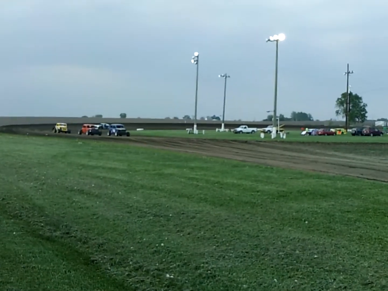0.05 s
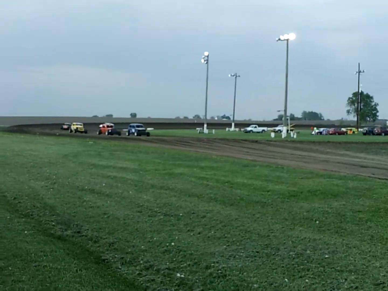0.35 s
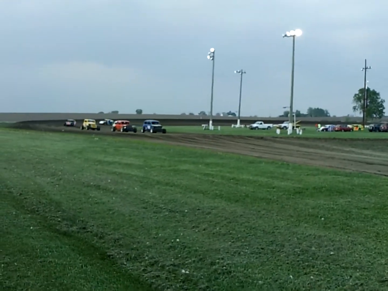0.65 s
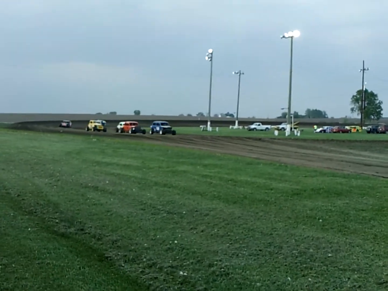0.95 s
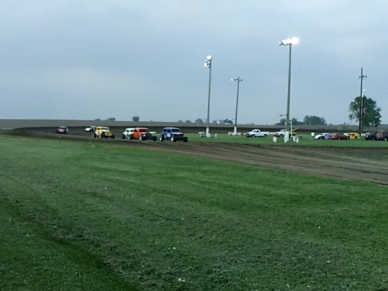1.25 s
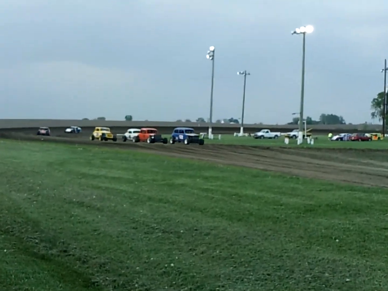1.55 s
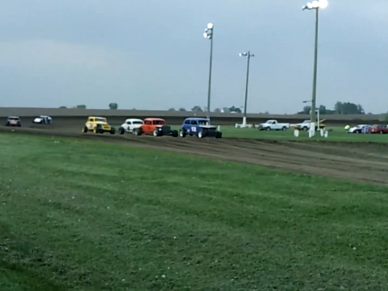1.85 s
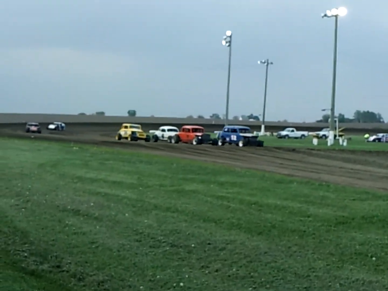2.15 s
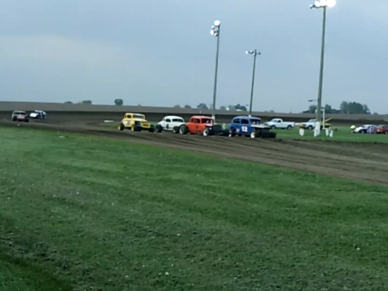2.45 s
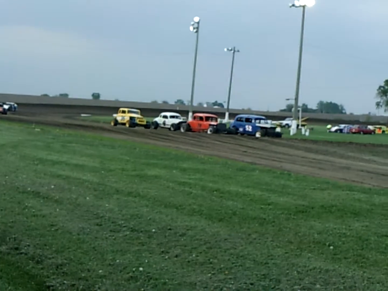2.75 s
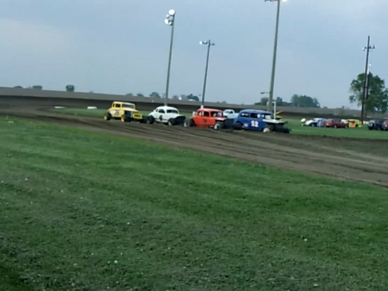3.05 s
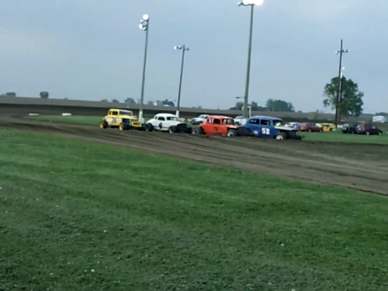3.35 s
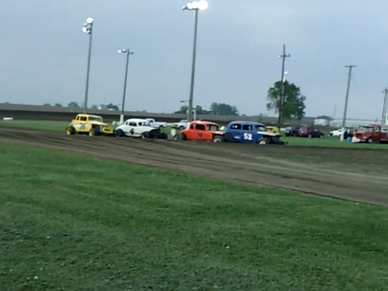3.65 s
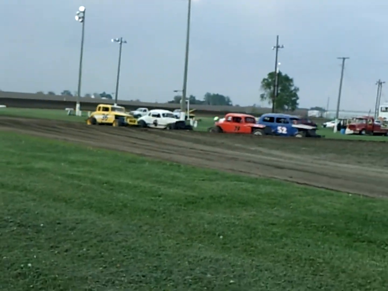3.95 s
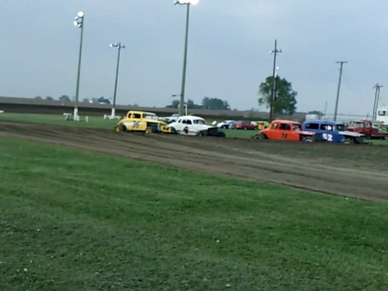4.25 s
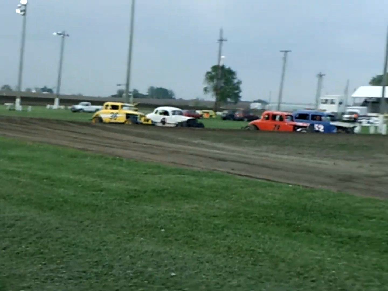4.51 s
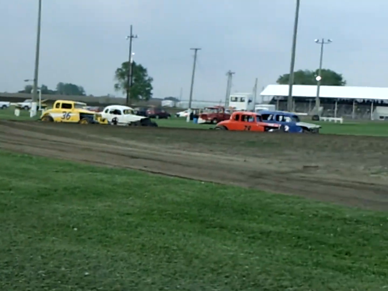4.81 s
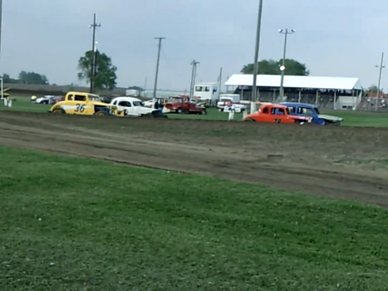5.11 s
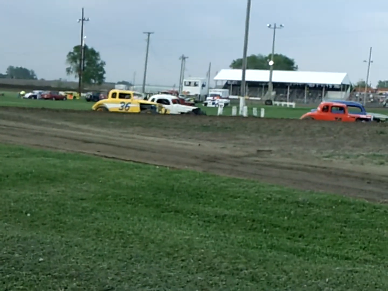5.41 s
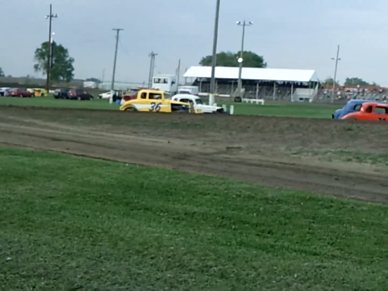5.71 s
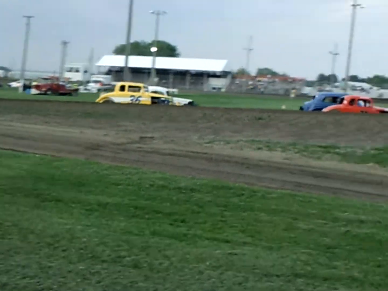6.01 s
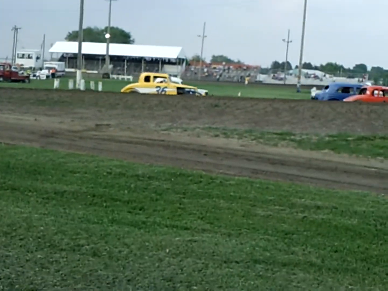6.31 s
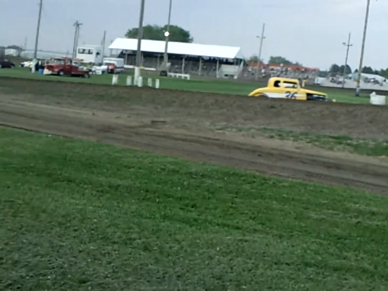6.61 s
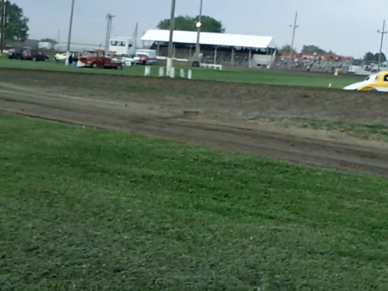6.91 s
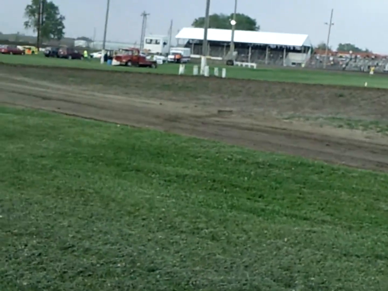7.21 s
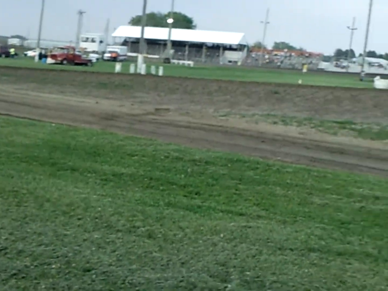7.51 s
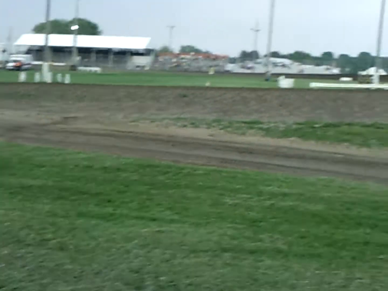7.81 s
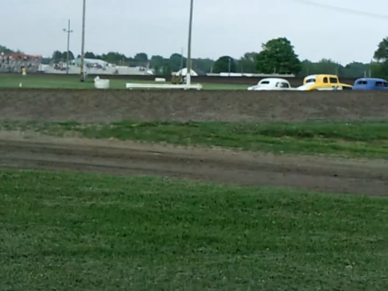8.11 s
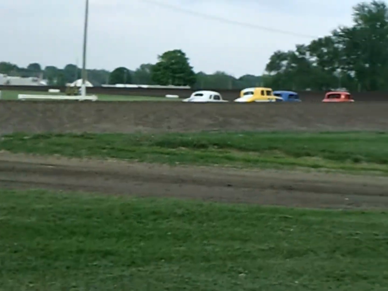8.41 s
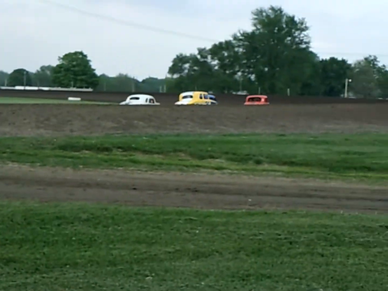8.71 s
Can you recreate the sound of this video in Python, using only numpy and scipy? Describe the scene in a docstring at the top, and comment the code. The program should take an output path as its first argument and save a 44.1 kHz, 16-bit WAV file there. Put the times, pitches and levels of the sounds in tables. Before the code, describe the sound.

A pack of race cars drones around a dirt track, exhausts crackling and tyres hissing in a light breeze.

```python
"""On the grass outside the turn of a dirt oval, a pack of V8 stock cars rolls round at part throttle.
Four near engines drone and beat against the lumpy burble of the field, their firings ringing the pipes.
Two drivers blip the throttle into the turn, exhausts crackle, and tyres hiss and fling dirt.
There is one brief click with a low thump, like a dropout in the sound.
A leaking manifold spits as the cars pull away, and a breeze buffets below."""
import sys
import numpy as np
from scipy import signal
from scipy.fft import rfft, irfft, next_fast_len
from scipy.io import wavfile
from scipy.ndimage import uniform_filter1d

SR = 44100
rng = np.random.default_rng(int(sys.argv[2]) if len(sys.argv) > 2 else 0)


def wav_record(signal):
    """Record a signal, one row per channel, as 16-bit PCM in the file named by sys.argv[1]."""
    frames = np.transpose(np.atleast_2d(signal))
    bounded = np.clip(frames, -1, 1)
    # unit amplitude maps onto the largest positive 16-bit level
    quanta = np.round(bounded * 32767).astype(np.int16)
    wavfile.write(sys.argv[1], SR, quanta)


N = 390726

# each near engine's boom, its strongest order: (time [s], pitch [Hz], level [dB])
LEADER_BOOM = [(0, 96, -37), (0.301, 97, -23.5), (.47, 104, -26), (.6, 104, -28.5), (1.0, 104.3, -26.5),
               (1.799, 104.5, -32), (2.35, 113, -32), (2.621, 118.5, -19), (3.15, 113.5, -42),
               (3.37, 118.5, -19), (3.56, 121.5, -20), (3.76, 128.5, -23.5), (4.349, 126.5, -27.5),
               (5.0, 123.6, -24.5), (5.4, 123, -32.5), (5.801, 120, -44), (6.598, 112, -28),
               (7.4, 114.4, -39), (8.07, 110.8, -30), (8.86, 107.5, -44)]
SECOND_BOOM = [(0, 159.1, -38), (.7, 158.9, -36.5), (1.45, 155.2, -40), (2.5, 152.9, -33),
               (3.5, 152.5, -31.5), (3.8, 160.2, -35), (4.4, 157.8, -31), (4.7, 153.6, -31.5),
               (5.05, 153.9, -26.5), (5.9, 150.9, -36), (6.45, 149.2, -30.5), (7.1, 144.3, -32.5),
               (7.7, 143.9, -32.5), (8.86, 149.7, -34)]
THIRD_BOOM = [(0, 77.9, -39), (.35, 75.5, -38), (1.0, 75.3, -37.5), (1.95, 68.5, -42.5), (2.3, 70.4, -40),
              (3.2, 72, -33), (3.82, 81.1, -26), (4.6, 77.8, -32.5), (5.1, 77.6, -28), (5.439, 80.7, -29),
              (6.0, 76, -38), (6.75, 78.3, -31.5), (7.35, 75.9, -29.5), (7.941, 78.7, -32.5),
              (8.86, 80, -27)]
FOURTH_BOOM = [(0, 116.8, -19), (.3, 116.6, -34), (.55, 116, -26.5), (.75, 115.1, -24),
               (1.15, 120.7, -28.5), (1.95, 117.2, -27.5), (2.2, 115.6, -38), (2.54, 113.4, -32),
               (2.85, 112.9, -33), (2.97, 112.5, -23), (3.1, 112.3, -32), (3.35, 110.9, -42),
               (3.801, 119, -29), (5.048, 118.6, -35.5), (5.65, 116.3, -28), (5.84, 107.2, -38),
               (5.93, 103.5, -24), (6.08, 106.1, -31), (6.291, 107.1, -20.5), (7.1, 112.9, -45),
               (7.76, 115.4, -33), (8.35, 117.1, -35), (8.86, 116, -30.5)]
# the eight firings of a cycle, weaker from the far bank's pipe: (strength [dB])
FIRING_DB = [1.5, -14.5, -3, -2.5, -21.5, -1.5, -10, -19.5]
# a driver opens the throttle and the pipe barks: (car, start [s], length [s], level [dB])
BARKS = [("leader", 3.565, 1.02, -38), ("leader", 3.3, 0.28, -37.5), ("second", 8.1, 0.47, -45),
         ("third", 4.3, 0.44, -44.5), ("third", 7.3, 0.588, -50), ("second", 0.55, 0.58, -44),
         ("fourth", 2.19, 0.59, -41.5), ("fourth", 3.2, 0.66, -38), ("fourth", 4.85, 0.9, -44),
         ("fourth", 7.5, 0.72, -39.5)]
# a pipe blares under load: (car, start [s], length [s], resonance [Hz], level [dB])
BLARES = [("third", 0.0, 0.061, 510, -48), ("leader", 0.3, 1.1, 527, -54), ("third", 0.33, 0.64, 370, -52),
          ("second", 0.19, 1.2, 800, -52.5), ("fourth", 2.5, 0.48, 675, -50),
          ("fourth", 3.35, 0.41, 550, -50), ("leader", 3.7, 0.6, 540, -53.5),
          ("second", 4.78, 0.42, 1530, -51), ("third", 4.79, 0.33, 1780, -56.5),
          ("fourth", 2.82, .35, 2100, -58.5), ("third", 4.55, 0.53, 391, -42),
          ("second", 5.05, 0.26, 285, -39.5), ("leader", 5.55, 0.2, 295, -39),
          ("second", 6.42, .4, 292, -39), ("leader", 4.8, 1.3, 1270, -53.5),
          ("second", 5.4, 1.376, 640, -56.5), ("third", 6.9, 0.58, 605, -48),
          ("leader", 7.55, 0.68, 1170, -52), ("second", 7.7, .55, 1380, -53),
          ("second", 7.65, 0.84, 980, -57), ("fourth", 7.7, 0.738, 712, -50)]
# tone of the near cars' pipes: (frequency [Hz], gain [dB])
NEAR_PIPE_EQ = [(150, -39), (240, -5), (300, 4), (350, 0.5), (400, -6.5), (470, -14), (560, -9),
                (660, -24.5), (780, -26.5), (1100, -25.5)]
# lumps (+) and brief dips (-) in the low drone: (time [s], width [s], gain [dB])
THROBS = [(0.31, 0.014, -17), (0.343, 0.035, 4), (0.425, 0.015, -4), (0.464, 0.022, 5), (0.722, 0.015, 6.5),
          (0.885, .02, -7), (1.175, 0.011, 7), (1.32, 0.028, -9), (1.971, 0.025, 4), (2.45, .03, -3),
          (2.545, 0.015, 5), (2.92, 0.0096, -21), (2.949, 0.018, 4), (3.07, 0.017, -8), (3.375, .02, 5),
          (4.103, 0.021, 2.5), (5.019, 0.023, 4), (5.27, .015, -6), (5.6, .03, -1), (5.676, 0.048, 5),
          (5.85, 0.039, -8), (5.922, 0.022, 6), (6.304, .04, 2.5), (6.42, 0.018, -12), (6.533, .02, 3),
          (6.59, 0.021, -9), (6.821, 0.017, 4), (8.25, .02, -4.5)]

# engine speeds of the far cars: (cycle rate [Hz])
FIELD_CYCLE_HZ = [18.4, 21.3, 22.6, 24.2, 27.5]
# faders for the whole field, before trim: (time [s], rumble [dB], bark [dB], rasp [dB])
FIELD_FADERS = [(0.1, -19.5, -40, -44), (0.12, -20.5, -35.5, -46), (0.63, -23.5, -33, -45.5),
                (1.62, -19.5, -33.5, -47.5), (1.69, -25.5, -37.5, -47.5), (2.05, -18, -31.5, -45.5),
                (2.46, -19.5, -34, -43), (2.53, -19.5, -31.5, -45.5), (3.26, -19, -34, -48),
                (3.43, -22.5, -34, -46), (3.76, -22, -34.5, -46.5), (4.63, -22, -35.5, -47.5),
                (5.18, -20, -34, -46), (6.89, -19, -33.5, -44), (7.06, -23, -40.5, -46),
                (8.44, -17, -32.5, -42.5), (8.75, -18, -30.5, -45)]
# centre of the field's bark, wandering between 280 and 354 Hz: (time [s], frequency [Hz])
BARK_CENTRE = [(0, 280), (.8, 303), (1.6, 300), (2.5, 340), (3.6, 338), (4.4, 320), (4.85, 354), (6.8, 303),
               (7.5, 335), (8.86, 323)]
# tone of the field's three exhaust layers: (frequency [Hz], gain [dB])
RUMBLE_EQ = [(30, -48.5), (55, -12), (75, -11.5), (92, -0.5), (110, 3.5), (135, -4), (165, -10.5),
             (200, -18.5), (250, -31.5), (400, -55)]
BARK_EQ = [(150, -26), (205, -4.5), (250, 4.5), (300, 6.5), (355, 2.5), (410, -8), (480, -19), (700, -50)]
RASP_EQ = [(300, -14), (450, -2.5), (560, -3.5), (720, -2), (880, -8.5), (1100, -10.5), (1600, -32.5),
           (3000, -37.5)]

# two drivers lift off and blip: (time [s], one bank's firing rate [Hz], level into the pipe [dB])
BLIP = [(0, 73.6, -34), (.07, 61.9, -41), (.16, 48.2, -45), (.23, 61.6, -46), (.32, 69.6, -38),
        (.42, 77, -38), (.6, 86, -38.5), (.78, 87.23, -37), (.9, 81, -41), (1.02, 73.7, -46),
        (1.15, 68.4, -52), (1.4, 68, -90)]
PICKUP = [(0, 66, -70), (.28, 67, -49), (.4, 71, -40), (.52, 76, -36), (.65, 77.5, -36), (.82, 71, -42.5),
          (.98, 68, -38.5), (1.1, 73, -33.5), (1.2, 76.8, -39), (1.44, 77.6, -34), (1.56, 72, -49),
          (1.8, 68, -92)]
# resonances of their pipes: (frequency [Hz], gain [dB])
REV_PIPE_EQ = [(130, -4), (170, -1.5), (225, -4), (305, 0.5), (375, -10.5), (440, -16.5), (520, -23),
               (700, -32)]

# cars sweep by, throwing dirt:
# (start [s], attack [s], length [s], release [s], clatter [dB], swish [dB], hiss [dB], spray [dB])
PASSES = [(0.0, 0.012, 0.63, 0.94, -56, -53.5, -59, -68), (0.342, 0.024, 0.078, 0.033, -52, -60, -58, -61),
          (1.852, 0.17, 0.8, 0.51, -57, -53, -53, -74), (2.358, .008, 0.021, 0.018, -47, -49, -41, -58),
          (2.75, 0.19, 0.62, 0.26, -52, -57, -51, -73), (3.45, .1, 0.58, .1, -54, -66, -63, -76),
          (3.863, 0.18, 0.4, 0.2, -51.5, -58, -45, -58.5),
          (4.751, 0.18, 0.58, 0.48, -50.5, -67, -46.5, -58.5), (5.2, 0.27, 0.4, 1, -54.5, -64, -47, -58.5),
          (5.93, 0.17, 0.91, 0.22, -52.5, -47.5, -46.5, -56),
          (6.208, 0.031, 0.034, 0.033, -60, -60, -46, -63),
          (6.983, 0.67, 1.04, 0.62, -50, -46.5, -45.5, -57),
          (7.997, 0.36, 0.62, 0.71, -50.5, -46.5, -45.5, -56)]
# the rolling bed under the passes: (clatter [dB], swish [dB], hiss [dB], spray [dB])
ROLLING_DB = [-53, -52, -50, -63.5]
# tone of engine clatter, tyre swish, tyre hiss and fine dirt spray: (frequency [Hz], gain [dB])
CLATTER_EQ = [(700, -17.5), (1150, -2), (1400, -4), (1650, -3), (2100, -6), (2600, -12.5), (4000, -41)]
SWISH_EQ = [(1700, -15), (2500, 1.5), (3200, 4), (4000, 4), (4600, 0.5), (5500, 7), (8000, -28)]
HISS_EQ = [(3200, -29), (4100, -6), (4750, 0), (5200, 2.5), (5550, -6), (6200, -29), (7500, -44.5),
           (12000, -45.5)]
SPRAY_EQ = [(4500, -21.5), (6000, 6.5), (7000, 1.5), (8100, -4.5), (9000, -14.5), (10500, -18),
            (12000, -28.5)]

# the loudest exhaust crackles: (time [s], strength [dB], brightness [dB], ring [Hz])
CRACKLES = [(0.005, -31.5, -26, 5270), (0.0248, -34, -29, 5400), (0.0752, -37, -30, 4910),
            (0.0972, -31, -25, 5200), (0.1181, -34, -20, 5000), (0.1925, -33, -18, 4950),
            (0.2324, -30, -23.5, 4800), (0.2843, -44, -16.5, 5400), (0.3361, -37, -23, 4460),
            (0.3591, -26, -24, 5180), (0.3787, -35, -22, 5600), (0.4005, -30, -21, 5695),
            (0.409, -36, -26, 5200), (0.4514, -30, -19.5, 5530), (0.6898, -38, -19, 5306),
            (0.7008, -31, -23, 4620), (0.7362, -36, -25, 4963), (0.7412, -33, -18, 5186),
            (0.9981, -34, -30, 5200), (1.1214, -28.5, -32, 5000), (1.277, -40, -16.5, 5260),
            (1.7439, -41, -17, 5050), (2.8414, -38, -17, 5040), (3.2814, -31, -22, 5100),
            (6.86, -42, -15.5, 5096), (7.6392, -39, -12, 5105)]
# the leak turns towards the listener and away: (time [s], strength [dB], brightness [dB])
LEAK_CURVE = [(7.3, -33, -28), (7.55, -36, -32), (7.9, -31, -29), (8.1, -28, -21), (8.17, -30, -19),
              (8.33, -33, -20), (8.48, -33, -29)]
# the leak's accented spits: (time [s], strength [dB], ring [Hz], brightness [dB])
HARD_SPITS = [(7.4168, -30, 4860, -35), (7.4951, -29, 5160, -34), (7.5213, -33, 5440, -33),
              (7.547, -29, 5140, -34), (7.5735, -24, 5180, -36), (7.5996, -26, 4900, -37),
              (7.6137, -24, 4870, -37), (7.626, -28, 4800, -36), (7.7042, -23.5, 5140, -38),
              (7.7302, -26.5, 5150, -35), (7.7803, -26.5, 5100, -32), (7.8055, -25.5, 5230, -29),
              (7.8836, -25.5, 4760, -34), (7.9345, -30, 5000, -28), (7.986, -26, 5110, -29),
              (8.0105, -23.5, 5060, -33), (8.0356, -23.5, 5140, -28), (8.0613, -23, 4910, -28),
              (8.0744, -27, 4800, -26), (8.0862, -23, 5080, -31), (8.1108, -26.5, 5400, -24),
              (8.1361, -32, 5200, -21), (8.1621, -23, 5100, -29), (8.175, -33, 5100, -18),
              (8.1872, -23.5, 5150, -28), (8.2114, -29.5, 4890, -21), (8.2501, -31, 5170, -19),
              (8.262, -27.5, 5340, -24), (8.2872, -33, 5200, -17.5), (8.3502, -36, 5320, -25)]
# tone of a pop's ringing body and of its thin edge: (frequency [Hz], gain [dB])
POP_BODY_EQ = [(1000, -28), (3000, -24.5), (4300, -6), (4900, -0.5), (5300, -2.5), (5900, -2), (7500, -37),
               (11000, -43), (16000, -61.5)]
POP_EDGE_EQ = [(4500, -23.5), (6300, 7.5), (7600, 2.5), (9000, -10.5), (10500, -12.5), (13000, -28.5),
               (16000, -36)]

# a brief click and its low thump: (level [dB], decay [s])
CLICK_PARTS = [(-24, .0007), (-28, .014)]
# showers of flung dirt: (start [s], length [s], top strength [dB])
DIRT_SHOWERS = [(0.299, 2.6, -44), (6.699, 1.7, -45.5)]
# the top hiss swells: (start [s], attack [s], length [s], release [s], level [dB])
GRIT_SWELLS = [(3.3, .12, 0.39, 0.11, -69), (6.2, 0.5, .7, .1, -68), (7.1, 0.25, 1.44, .3, -68.5)]
# tone of the top hiss and the dirt grains: (frequency [Hz], gain [dB])
GRIT_EQ = [(6000, -8.5), (8000, 0.5), (9200, -1), (10300, -2.5), (11500, -9), (13000, -14.5), (15500, -22)]
# gusts of breeze: (start [s], length [s], level [dB])
GUSTS = [(0.0, 0.45, -32), (1.697, 0.13, -35), (5.901, 0.93, -43), (7.2, 0.82, -33.5)]
# tone of their buffeting: (frequency [Hz], gain [dB])
BUFFET_EQ = [(8, -32.5), (25, -10), (34, -7.5), (42, -2.5), (52, 0.5), (90, -6.5), (400, -52.5)]

BARK_ATTACK_S, BARK_RELEASE_S = 0.11, 0.13   # barks and blares share this envelope
PING_HZ, PING_SPREAD_HZ = 5070, 250   # ring of the lesser spits and pops


def near_car(name, boom_curve, boom_order, bark_order, overtones_db, coasting_db=-53.5):
    """Two multiples of the engine cycle sing out of the firings; returns sound and running cycle count."""
    hz, boom_db = automation(boom_curve)
    bursts = [(start, BARK_ATTACK_S, length, BARK_RELEASE_S, db)
              for car, start, length, db in BARKS if car == name]
    bark_db = swells(bursts, coasting_db)
    cycles = np.cumsum(hz / boom_order * (1 + 0.00503 * drift(7.81))) / SR + rng.random()
    boom = from_db(boom_db + 2.1 * drift(6.7)) * np.sin(2 * np.pi * boom_order * cycles)
    ragged = cycles + .0028 * drift(14)
    bark = from_db(bark_db + 2.0 * drift(10)) * np.sin(2 * np.pi * bark_order * ragged)
    pipe = rms_one(colour(firings(ragged, uneven_db=5.5), NEAR_PIPE_EQ))
    overtones = from_db(bark_db + overtones_db) * pipe
    return np.sqrt(2) * (boom + bark) + overtones + blare(name, cycles), cycles


def firings(cycles, uneven_db):
    """One pulse per cylinder, eight to a cycle, none quite like the last."""
    count = np.floor(cycles * len(FIRING_DB)).astype(int)
    at = np.flatnonzero(np.diff(count))
    cylinder = count[at] % len(FIRING_DB)
    strength_db = np.array(FIRING_DB)[cylinder] + uneven_db * rng.standard_normal(N)[:len(at)]
    return clicks(at / SR, from_db(strength_db))


def blare(name, cycles, relative_width=0.14):
    """Under load, ragged firings growl in a narrow resonance of the pipe."""
    pulses = firings(cycles + .012 * drift(25), uneven_db=3.5)
    out = 0
    for car, start, length, hz, db in BLARES:
        if car == name:
            growl = bandpass(pulses, hz * (1 - relative_width / 2), hz * (1 + relative_width / 2))
            level_db = swells([(start, BARK_ATTACK_S, length, BARK_RELEASE_S, db)], floor_db=-90)
            out = out + from_db(level_db) * steady(growl, span_s=.035)
    return out


def field(near_cycles):
    """The pack's firings overlap in the low pipe resonances; escaping gas rasps above them."""
    rumble_db, bark_db, rasp_db = automation(FIELD_FADERS)
    bark_hz, = automation(BARK_CENTRE)
    far_cycles = [np.cumsum(hz * (1 + .035 * drift(.4) + .018 * drift(4))) / SR + rng.random()
                  for hz in FIELD_CYCLE_HZ]
    far = sum(firings(c, uneven_db=3.0) for c in far_cycles)
    near = sum(firings(c, uneven_db=3.5) for c in near_cycles)
    pulses = far + from_db(-9.5) * near
    pulses = pulses - pulses.mean()
    gas = rms_one(tails(far + near, decay_s=0.0032)) * rng.standard_normal(N)
    bark = moving_resonance(colour(pulses, BARK_EQ), bark_hz, width_oct=0.48)
    rasp = colour(gas + 0.54 * rms_one(pulses), RASP_EQ)
    return (from_db(rumble_db - 3.5) * steady(colour(pulses, RUMBLE_EQ), span_s=0.089)
            + from_db(bark_db - 3.0) * steady(bark, span_s=0.076)
            + from_db(rasp_db - 0.5) * steady(rasp, span_s=.1))


def throbbing(x, split_hz=200, evenness=0.36, lump_s=.07, swell_s=0.36):
    """The bass swells and dips in distinct lumps; between them it runs more evenly."""
    t = np.arange(N) / SR
    bass = signal.sosfiltfilt(signal.butter(3, split_hz, fs=SR, output="sos"), x)
    levelling = (mean_power(bass, swell_s) / mean_power(bass, lump_s)) ** (evenness / 2)
    throb_db = sum(db * np.exp(-np.minimum(((t - s) / width) ** 2, 20)) for s, width, db in THROBS)
    return x - bass + bass * levelling * from_db(throb_db)


def revving(curve, waver=0.012, flutter_db=2.5):
    """Harmonics of one bank's firings glide through the resonances of its pipe."""
    hz, level_db = automation(curve)
    turns = np.cumsum(hz * (1 + waver * drift(13))) / SR
    pipe_hz, pipe_db = np.transpose(REV_PIPE_EQ)
    out = 0
    for k in range(3, 9):
        harmonic_db = level_db + np.interp(k * hz, pipe_hz, pipe_db) + flutter_db * drift(11)
        out = out + from_db(harmonic_db) * np.sin(2 * np.pi * (k * turns + rng.random()))
    return np.sqrt(2) * out


def passing(cycles):
    """Engine clatter throbs with one cylinder bank; tyres swish and fling dirt."""
    start, attack, length, release, *peaks_db = np.transpose(PASSES)
    clatter_db, swish_db, hiss_db, spray_db = [
        swells(zip(start, attack, length, release, peak_db), floor_db)
        for peak_db, floor_db in zip(peaks_db, ROLLING_DB)]
    throb = np.cos(2 * np.pi * 4 * cycles)   # a bank fires four times a cycle
    flutter = drift(43)

    def layer(level_db, eq, throb_db, flutter_db):
        """Noise that pulses with the engine and flutters with the turning tyres."""
        noise = rng.standard_normal(N) * from_db(throb_db * throb + flutter_db * flutter)
        return from_db(level_db) * rms_one(colour(noise, eq))
    return (layer(clatter_db, CLATTER_EQ, throb_db=1.5, flutter_db=0.85)
            + layer(swish_db, SWISH_EQ, throb_db=0.0, flutter_db=1.46)
            + layer(hiss_db, HISS_EQ, throb_db=0.5, flutter_db=1.5)
            + layer(spray_db, SPRAY_EQ, throb_db=1.5, flutter_db=1.0))


def exhaust_crackle(per_s=70, thinning_s=1.8, fade_db_per_s=1.2):
    """Loud exhaust cracks, with small random pops that thin out as the cars settle into the turn."""
    loud = pops(CRACKLES, decay_s=0.0059, body_db=7.5, edge_db=-13.5, ping_db=-6.0)
    when, force, brightness, tuning = rng.random((int(per_s * thinning_s), 4)).T
    s = -thinning_s * np.log(1 - when)
    strength_db = -38 + 7 * force ** 2 - fade_db_per_s * s
    ring_hz = PING_HZ + 2 * PING_SPREAD_HZ * (2 * tuning - 1)
    rows = np.column_stack([s, strength_db, 8 * brightness ** 2, ring_hz])
    return loud + pops(rows[s < N / SR - .1], decay_s=0.002, body_db=1.5, edge_db=-13.5, ping_db=-5.0)


def manifold_leak(start_s=7.3354, firing_hz=75.1, rise_hz_per_s=5.6, count=88):
    """The leaking bank spits at every firing, strong and weak in turn, as its engine gathers speed."""
    k = np.arange(count)
    s = start_s + (np.sqrt(firing_hz ** 2 + 2 * rise_hz_per_s * k) - firing_hz) / rise_hz_per_s
    curve_s, curve_db, bright_db = np.transpose(LEAK_CURVE)
    strength_db = np.interp(s, curve_s, curve_db) - 3.0 * (k % 2) + 1.5 * rng.standard_normal(count)
    ring_hz = PING_HZ + PING_SPREAD_HZ * rng.standard_normal(count)
    rows = np.column_stack([s, strength_db, np.interp(s, curve_s, bright_db), ring_hz])
    for hard_s, hard_db, hard_hz, hard_bright_db in HARD_SPITS:   # each takes the nearest firing's place
        rows[np.argmin(np.abs(s - hard_s))] = hard_s, hard_db, hard_bright_db, hard_hz
    return pops(rows, decay_s=0.0023, body_db=6.0, edge_db=-14, ping_db=-3.0, spike=2.87, puff=0.92)


def pops(rows, decay_s, body_db, edge_db, ping_db, spike=3.9, puff=0.89):
    """A pressure spike and its puff of gas ring near 5 kHz; bright puffs have a thin edge above that."""
    s, strength_db, bright_db, ring_hz = np.transpose(rows)
    body = spike * clicks(s, from_db(strength_db)) + puff * noise_bursts(s, strength_db, decay_s)
    edge = noise_bursts(s, strength_db + 1.25 * (bright_db - np.median(bright_db)), decay_s)
    return (from_db(body_db) * colour(body, POP_BODY_EQ)
            + from_db(edge_db) * colour(edge, POP_EDGE_EQ)
            + pings(s, strength_db + ping_db, ring_hz))


def pings(s, peak_db, ring_hz, rise_s=0.00047, decay_s=0.0019):
    """Each pop rings the metal for a few milliseconds at a pitch of its own."""
    t = np.arange(SR // 50) / SR
    shape = (1 - np.exp(-t / rise_s)) * np.exp(-t / decay_s)
    waves = from_db(peak_db)[:, None] * shape / shape.max() * np.sin(2 * np.pi * ring_hz[:, None] * t)
    onsets = np.round(s * SR) / SR
    return clicks((onsets[:, None] + t).ravel(), waves.ravel())


def dropout_click(at_s=2.7703):
    """A brief click with a low thump, like a dropout in the sound."""
    step = sum(tails(clicks([at_s], from_db([db])), decay_s) for db, decay_s in CLICK_PARTS)
    return signal.sosfilt(signal.butter(1, 12, "high", fs=SR, output="sos"), step)


def dirt_patter(grains=26, spread_db=9):
    """Flung grains of dirt land at random as tiny dry ticks."""
    s, db = np.hstack([(start + length * rng.random(grains), top_db - spread_db * rng.random(grains))
                       for start, length, top_db in DIRT_SHOWERS])
    return colour(noise_bursts(s, db, decay_s=.0015), GRIT_EQ)


def grit(flutter_db=2.5):
    """A thin, fluttering hiss on top of the mix."""
    level_db = swells(GRIT_SWELLS, floor_db=-71) + flutter_db * drift(30)
    return from_db(level_db) * rms_one(colour(rng.standard_normal(N), GRIT_EQ))


def breeze(attack_s=0.07, release_s=0.11):
    """Gusts buffet softly below the engines."""
    gusts = [(start, attack_s, length, release_s, db) for start, length, db in GUSTS]
    buffet = steady(colour(rng.standard_normal(N), BUFFET_EQ), span_s=0.21)
    return from_db(swells(gusts, floor_db=-39)) * buffet


def from_db(db):
    """Decibels to gain."""
    return 10 ** (np.asarray(db) / 20)


def rms_one(x):
    """Scale to rms 1."""
    return x / np.sqrt(np.mean(x ** 2) + 1e-20)


def mean_power(x, span_s):
    """Power in a sliding window."""
    return np.abs(uniform_filter1d(x * x, int(span_s * SR))) + 1e-12


def steady(x, span_s):
    """Ride the gain to rms 1: slow swells even out, fast beating stays."""
    return x / np.sqrt(mean_power(x, span_s))


def automation(rows):
    """One lane per column after the time, ramped sample by sample."""
    s, *columns = np.transpose(rows)
    return [np.interp(np.arange(N) / SR, s, c) for c in columns]


def swells(rows, floor_db):
    """Level in dB of a steady floor plus swells that rise, hold and die away."""
    t = np.arange(N) / SR
    power = from_db(floor_db) ** 2
    for start, attack, length, release, db in rows:
        rise = np.clip((t - start) / attack, 0, 1)
        fall = np.exp(-np.clip(t - start - length, 0, 10 * release) / release)
        power = power + (from_db(db) * rise * fall) ** 2
    return 10 * np.log10(power)


def drift(rate_hz, hop=40):
    """Smooth random wander of spread 1."""
    pole = np.exp(-2 * np.pi * hop * rate_hz / SR)
    noise = rng.standard_normal(N // hop + 2002)
    slow = signal.lfilter([1], [1, -2 * pole, pole * pole], noise)[2000:]   # skip the settling
    return np.interp(np.arange(N) / hop, np.arange(len(slow)), rms_one(slow))


def clicks(times, heights):
    """Single-sample impulses."""
    return np.bincount(np.clip(np.round(np.asarray(times) * SR).astype(int), 0, N - 1), heights, N)


def tails(pulses, decay_s):
    """Give each pulse an exponential tail."""
    return signal.lfilter([1], [1, -np.exp(-1 / (decay_s * SR))], pulses + 1e-18)


def noise_bursts(times, peak_db, decay_s):
    """Puffs of white noise with an instant attack."""
    return tails(clicks(times, from_db(peak_db)), decay_s) * rng.choice([-1, 1], N)


def bandpass(x, low_hz, high_hz):
    """Keep one band."""
    return signal.sosfilt(signal.butter(2, [low_hz, high_hz], "band", fs=SR, output="sos"), x)


def moving_resonance(x, centre_hz, width_oct):
    """Third-octave bands, each as loud as it is close to the moving centre."""
    return sum(bandpass(x, hz * .9, hz / .9) / (1 + (np.log2(hz / centre_hz) / width_oct) ** 2)
               for hz in np.geomspace(200, 460, 6))


def colour(x, eq):
    """Minimum-phase EQ, falling 18 dB an octave above its last point."""
    size = 2 * next_fast_len(N // 2 + SR // 4)
    hz, db = np.transpose(eq)
    log_hz = np.log(np.arange(size // 2 + 1) * SR / size + 1)
    rolloff = 3 * np.maximum(log_hz - np.log(hz[-1]), 0)
    log_gain = np.log(from_db(np.interp(log_hz, np.log(hz), db))) - rolloff
    cepstrum = irfft(log_gain)[:size // 2]
    cepstrum[1:] *= 2   # one-sided, so nothing rings ahead of a hit
    return irfft(rfft(x, size) * np.exp(rfft(cepstrum, size)))[:N]


def scene():
    """Engines in front, then tyres and exhaust pops, over dirt and open air; mono."""
    drones, cycles = zip(near_car("leader", LEADER_BOOM, boom_order=5, bark_order=12, overtones_db=-4.5),
                         near_car("second", SECOND_BOOM, boom_order=8, bark_order=16, overtones_db=-4.5),
                         near_car("third", THIRD_BOOM, boom_order=4, bark_order=20, overtones_db=-1.0),
                         near_car("fourth", FOURTH_BOOM, boom_order=6, bark_order=18, overtones_db=-8.0))
    crackle = exhaust_crackle()
    engines = throbbing(sum(drones) + field(cycles)) + revving(BLIP) + revving(PICKUP)
    cars = engines + passing(cycles[2]) + crackle + manifold_leak()
    return (cars + grit() + dropout_click() + breeze() + dirt_patter())[None]


def record(dry, fade_in_s=.003, cutoff_hz=15800):
    """A quick fade-in and a steep high cut."""
    fade_in = np.minimum(np.arange(N) / (fade_in_s * SR), 1)
    return signal.sosfilt(signal.ellip(10, .1, 80, cutoff_hz, fs=SR, output="sos"), dry * fade_in)


dry = scene()
out = record(dry)
wav_record(out)
```